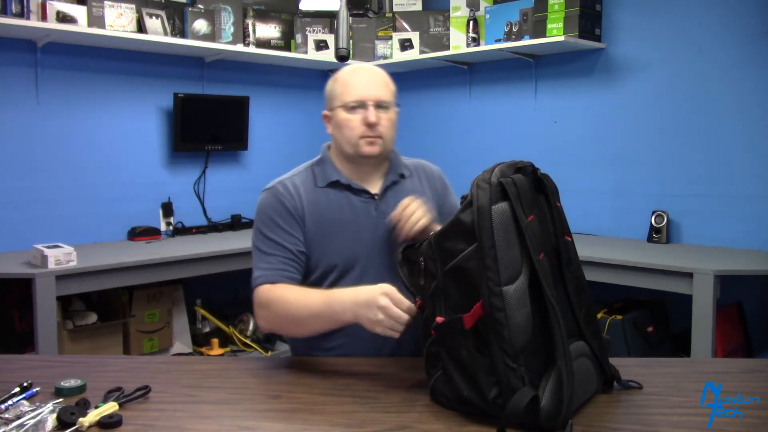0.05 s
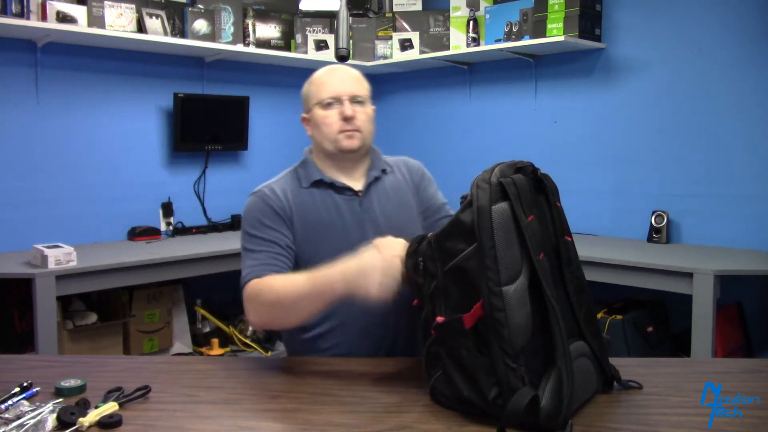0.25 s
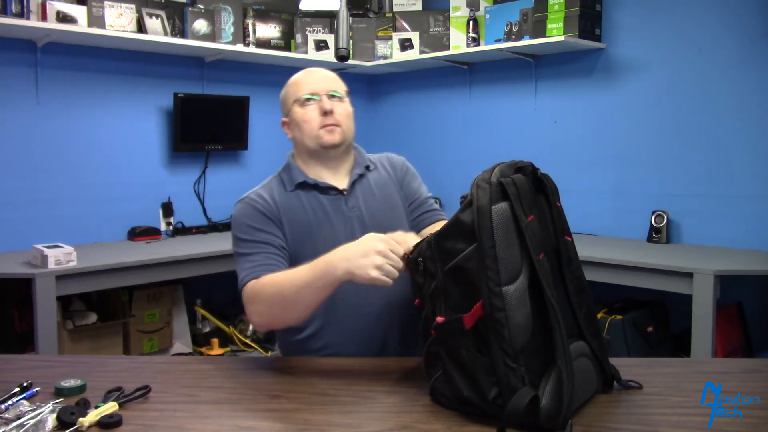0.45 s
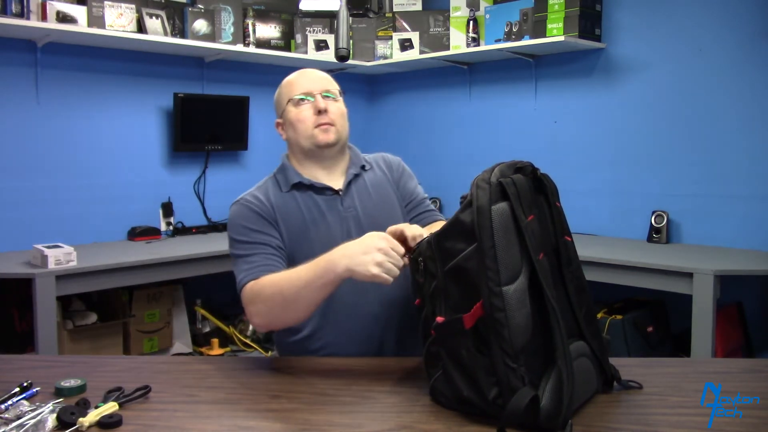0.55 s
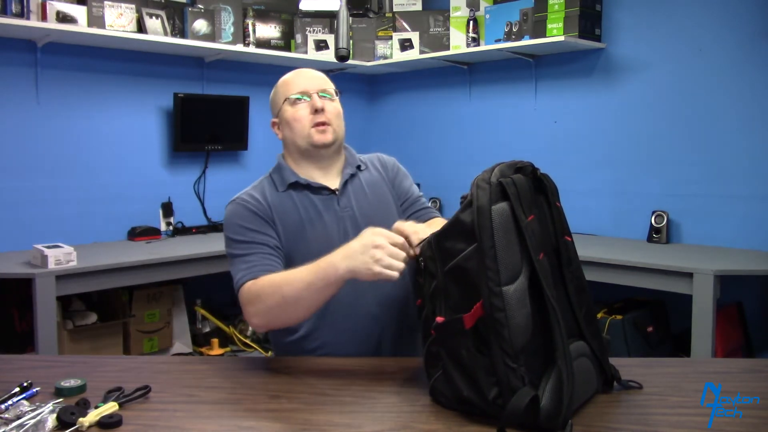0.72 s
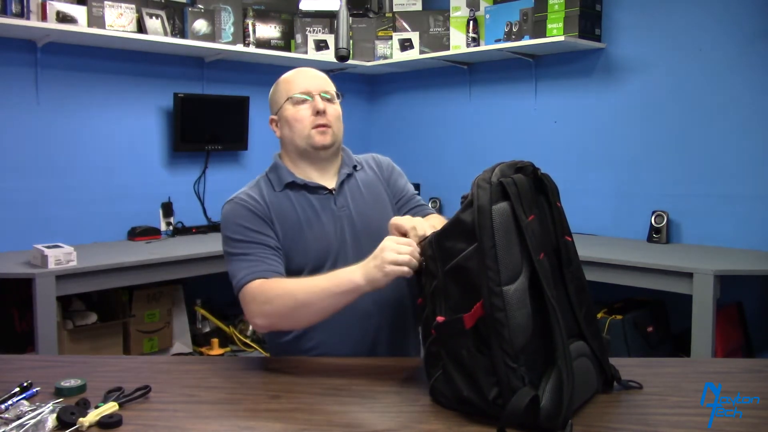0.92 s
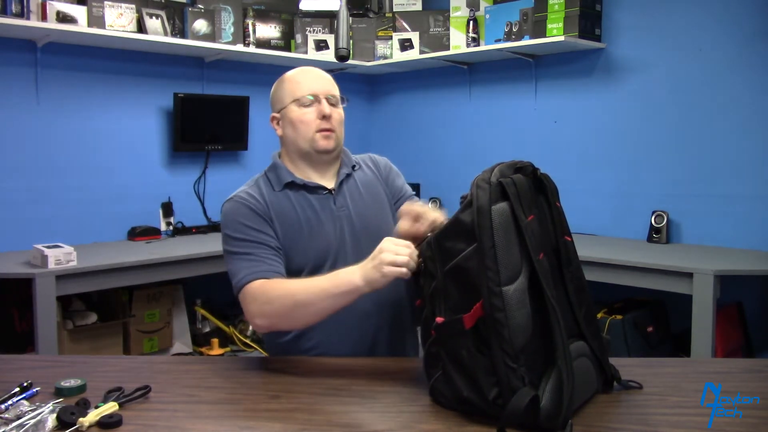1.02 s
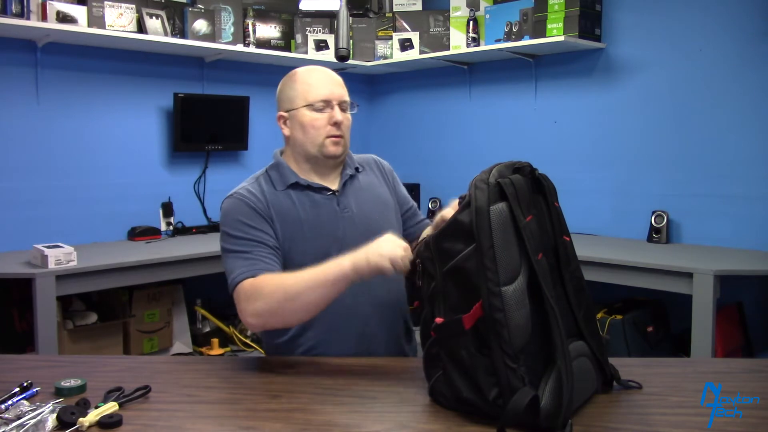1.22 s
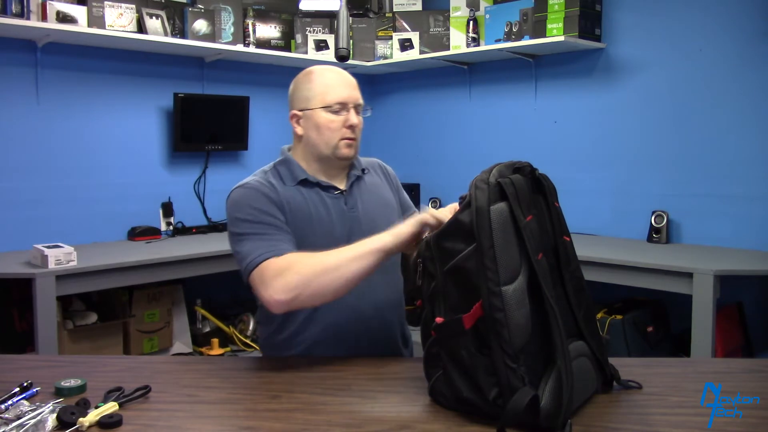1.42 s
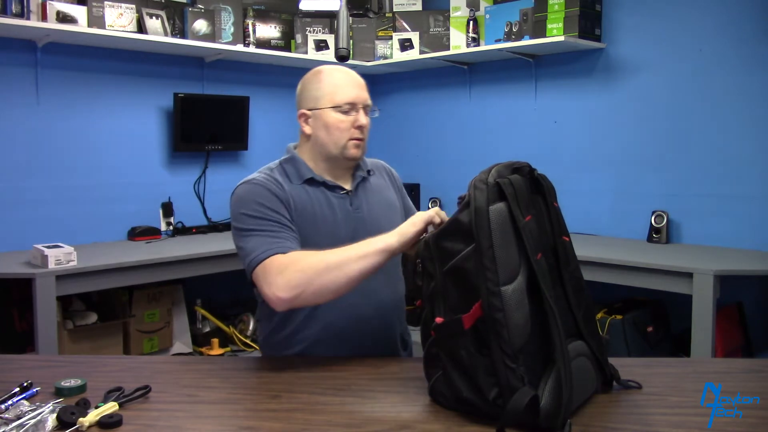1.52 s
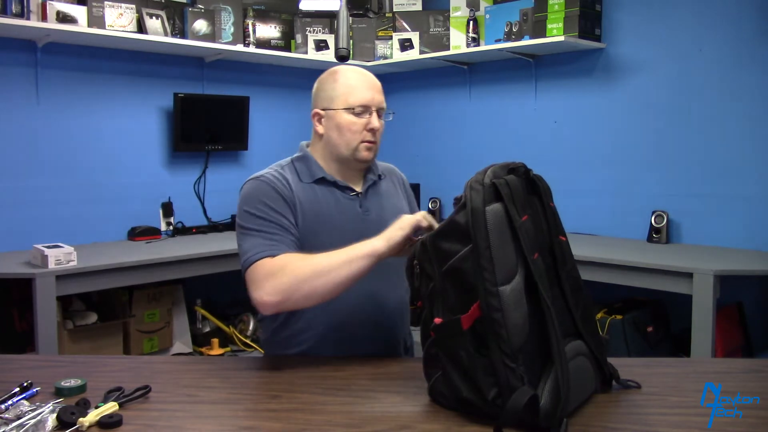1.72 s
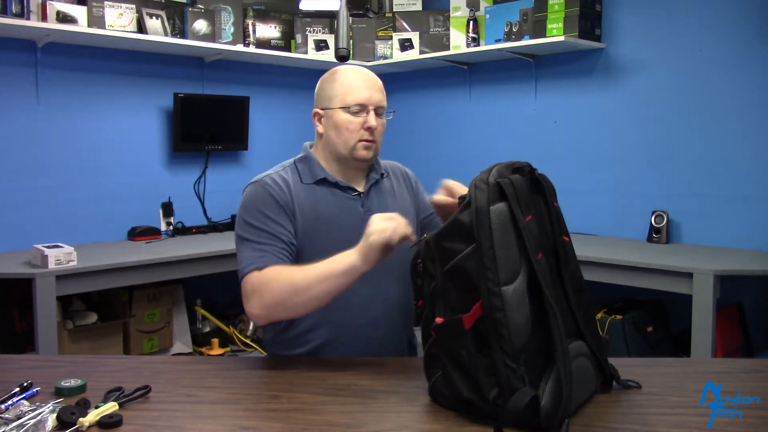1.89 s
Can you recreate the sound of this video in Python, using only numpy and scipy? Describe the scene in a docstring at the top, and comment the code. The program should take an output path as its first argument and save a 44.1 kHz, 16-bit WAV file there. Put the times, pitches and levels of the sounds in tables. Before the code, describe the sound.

A backpack zipper is pulled in three short buzzing strokes, with nylon rustle and small metallic ticks.

```python
"""A small workshop room: a coil zipper on a nylon backpack is pulled in three short strokes and one faint nudge.
The slider buzzes over the teeth as a stack of overtones whose pitch follows the hand; the cloth rustles as
crackling coloured noise and thumps as ringing clusters that knock the bag. The metal pull tab ticks as short
noise bursts, feedback delays give the room, and room tone and a low rumble lie under everything."""
import sys
import numpy as np
from scipy import signal
from scipy.io import wavfile

SR = 44100
rng = np.random.default_rng(int(sys.argv[2]) if len(sys.argv) > 2 else 0)


def convert_level_to_amplitude(level_db):
    """Map a level in decibels to its linear amplitude factor."""
    exponent = np.asarray(level_db, float) / 20
    return 10 ** exponent


def unload_wav(signal):
    """Save mono or channel-first audio to the path in sys.argv[1] as 16-bit WAV at rate SR, clipped to [-1, 1]."""
    wavfile.write(
        sys.argv[1],
        SR,
        np.round(np.clip(np.atleast_2d(signal).T, -1, 1) * 32767).astype(np.int16),
    )


N = 85995  # length in samples


def rms_one(x):
    """Scale to rms 1."""
    return x / np.sqrt(np.mean(x ** 2) + 1e-20)


def in_time(rows):
    """Glide through the columns of a timed table: one value per sample for each column."""
    s, *columns = np.transpose(rows)
    return [np.interp(np.arange(N) / SR, s, column) for column in columns]


def drift(rate_hz):
    """Slow random wander of rms 1: noise through two equal one-pole low-passes."""
    pole = np.exp(-2 * np.pi * rate_hz / SR)
    noise = rng.standard_normal(N + SR)
    settled = signal.lfilter([1], [1, -2 * pole, pole * pole], noise)[SR:]
    return rms_one(settled)


def band_pass(x, low_hz, high_hz, order=2):
    """Butterworth band-pass."""
    return signal.sosfilt(signal.butter(order, [low_hz, high_hz], "band", fs=SR, output="sos"), x)


def coloured(noises, spectrum, patchy_db):
    """Third-octave bands of two noises in turn, each with its level and a flicker; rms 1 in sum."""
    hz, db = np.transpose(spectrum)
    out, edges = 0, 16 * 2 ** (np.arange(31) / 3)
    flicker = [drift(9.5) for _ in range(6)]
    for k, (low, high) in enumerate(zip(edges, edges[1:])):
        level = np.interp(np.log(low * high) / 2, np.log(hz), db)
        if level > -70:  # skip inaudible bands
            band = band_pass(noises[k % 2], low, high)
            out = out + convert_level_to_amplitude(level + patchy_db * flicker[k % 6]) * band
    return rms_one(out)


def ring(clicks, hz, t60_s):
    """Resonator: a unit click sets a decaying sine of height 1 ringing."""
    r, w = convert_level_to_amplitude(-60 / (t60_s * SR)), 2 * np.pi * hz / SR
    return signal.lfilter([0, np.sin(w)], [1, -2 * r * np.cos(w), r * r], clicks + 1e-18)


# colour of the room tone: f/Hz, relative level/dB per Hz
AIR_SPECTRUM = [(53, -20), (90, 13), (786, -7), (977, -22.5), (2710, -12), (6030, -43), (12600, -32),
                (16000, -33)]
# swell of the deep rumble: t/s, level/dB
RUMBLE_LEVEL = [(0.0, -34), (0.054, -48), (0.254, -36.5), (0.396, -48), (1.574, -40.5), (1.95, -48.5)]
AIR_DB, RUMBLE_TOP_HZ = -48.5, 100
FADING_HZ, FADING_WIDTH_HZ, FADING_DB, FADING_END_S = 582, 39, -39, 0.069


def background():
    """Room tone, a wavering deep rumble, and a faint narrow-band noise tone that ends early."""
    air = convert_level_to_amplitude(AIR_DB) * coloured(rng.standard_normal((2, N)), AIR_SPECTRUM, patchy_db=1.5)
    rumble = rms_one(band_pass(drift(44), 18, RUMBLE_TOP_HZ))
    rumble_db, = in_time(RUMBLE_LEVEL)
    tone = rms_one(ring(rng.standard_normal(N), FADING_HZ, 2.2 / FADING_WIDTH_HZ))
    fade_out = np.clip((FADING_END_S - np.arange(N) / SR) / 0.011, 0, 1)
    return air + convert_level_to_amplitude(rumble_db) * rumble + convert_level_to_amplitude(FADING_DB) * tone * fade_out


# cloth rustle: t/s, hiss level/dB, top octave relative to the hiss level/dB, body of the bag level/dB
RUSTLE_MOVES = [(0, -44.5, -7, -49), (.178, -55.5, 0.5, -62), (.194, -36, -11.5, -32.5),
                (.24, -33.5, -13, -32), (.345, -42.5, -11, -37), (.532, -40.5, -10, -77),
                (.574, -49.5, -11, -56), (.646, -46, -8, -48.5), (.672, -53, -9, -54), (.86, -52, -8, -63),
                (.9, -44, -7.5, -49.5), (.93, -50.5, -10, -55.5), (.976, -42.5, -8, -36),
                (1.02, -34.5, -8.5, -34.5), (1.14, -32, -12.5, -35.5), (1.259, -38, -2, -39),
                (1.268, -44, -10, -37.5), (1.428, -58.5, -4.5, -60), (1.447, -41.5, -10, -41),
                (1.514, -37, 0, -36), (1.602, -31, -4, -29.5), (1.645, -46, -12, -31),
                (1.705, -44, -0.5, -36.5), (1.74, -49, -5, -41.5), (1.8, -51, -0.5, -39),
                (1.86, -55.5, -4, -41), (1.95, -62, 1, -48.5)]
# colour of the cloth hiss: f/Hz, relative level/dB per Hz
HISS_SPECTRUM = [(1290, -4), (3740, -6.5), (6700, -6), (7800, -17.5), (11000, -26), (18700, -120)]
# colour of the top octave of the cloth: f/Hz, relative level/dB per Hz
TOP_SPECTRUM = [(6500, -18.5), (11000, -5.5), (12600, -5.5), (14300, -7), (16000, -32)]
# colour of the body of the bag: f/Hz, relative level/dB per Hz
BODY_SPECTRUM = [(65, -52), (110, 1.5), (412, 1.5), (695, -2), (1110, -0.5), (1230, -7.5), (2500, -31.5),
                 (3250, -75)]
GRAINS_PER_S, GRAIN_SPREAD_DB = 3000, 3.3  # typical crackle rate, which wanders; spread of crackle sizes
GRAIN_SHARE, BODY_GRAIN_SHARE = 0.35, 0.34  # power share of crackles in the hiss and in the body
TOOTH_GATE = 0.5  # depth to which the teeth pulse the hiss


def rustle(beat):
    """Nylon rubbing: noise mixed with dense crackles, pulsed by the teeth; the bag sounds below."""
    hiss_db, top_db, body_db = in_time(RUSTLE_MOVES)
    sizes = convert_level_to_amplitude(GRAIN_SPREAD_DB * np.minimum(rng.exponential(1, (2, N)), 5))
    sizes = sizes * rng.choice([-1, 1], (2, N))
    chance = GRAINS_PER_S * convert_level_to_amplitude(4.0 * drift(25)) / SR
    grains = rms_one(sizes * (rng.random((2, N)) < chance))
    white = rng.standard_normal((2, N))
    rub = np.sqrt(GRAIN_SHARE) * grains + np.sqrt(1 - GRAIN_SHARE) * white
    dull = np.sqrt(BODY_GRAIN_SHARE) * grains + np.sqrt(1 - BODY_GRAIN_SHARE) * white
    rub = rub * (1 + TOOTH_GATE * beat)
    hiss = coloured(rub, HISS_SPECTRUM, patchy_db=2.5)
    hiss = hiss + convert_level_to_amplitude(top_db) * coloured(rub, TOP_SPECTRUM, patchy_db=3.0)
    body_gain = convert_level_to_amplitude(body_db + 1.5 * drift(45))
    return convert_level_to_amplitude(hiss_db) * hiss + body_gain * coloured(dull, BODY_SPECTRUM, patchy_db=2.0)


# cloth thumps: first touch t/s, peak level ahead of the band-pass/dB, pitch f/Hz, level of the bag's answer/dB
THUMP_HITS = [(0.129, -27.5, 1410, -68), (0.64, -21.5, 980, -49), (.782, -33, 1120, -39.5),
              (.838, -19, 826, -39), (.841, -22, 1210, -37.5), (.895, -32, 1050, -50),
              (1.239, -30, 1007, -34), (1.251, -22.5, 1310, -37), (1.272, -22, 870, -28),
              (1.356, -31.5, 1100, -49), (1.4345, -20.5, 1337, -33), (1.443, -22, 1250, -30),
              (1.4652, -20.5, 1450, -27.5), (1.477, -28, 1630, -29), (1.491, -17.5, 1380, -21),
              (1.6187, -9.5, 1040, -26.5), (1.643, -18, 1100, -41), (1.782, -21, 1320, -43),
              (1.806, -25, 1860, -51), (1.819, -27, 2350, -40), (1.837, -23.5, 1120, -34.5),
              (1.848, -36, 900, -31.5)]
# modes of the bag: f/Hz, relative level/dB, t60/s
BAG_MODES = [(276, 16.5, 0.017), (476, 3.5, 0.019), (583, 4, 0.031)]
THUMP_CYCLES, CONTACT_S = 7.0, 0.001  # cycles to ring down by 60 dB; time from first touch to the blow
CRUMPLE_T60_S = 0.027  # decay of the cluster in each blow
BAG_CREST_DB = 10.5  # peak of the bag's answer over its level


def thumps():
    """Each thump is a short cluster that rings a few cycles at its pitch and knocks the bag."""
    length = 3000
    out = np.zeros(N)
    mode_spread_db = rng.normal(0, 1.5, (len(THUMP_HITS), len(BAG_MODES)))
    decay = convert_level_to_amplitude(-60 * np.arange(length) / SR / CRUMPLE_T60_S)
    clusters = rng.standard_normal((len(THUMP_HITS), length)) * decay * 0.065
    clusters[:, 0] = -1  # the first click leads the cluster
    for (s, db, hz, bag_db), spread, blow in zip(THUMP_HITS, mode_spread_db, clusters):
        i = int((s + CONTACT_S) * SR)
        knock = ring(blow, hz, THUMP_CYCLES / hz)
        bag = sum(convert_level_to_amplitude(d + c) * ring(blow, f, t60) for (f, d, t60), c in zip(BAG_MODES, spread))
        out[i:i + length] += convert_level_to_amplitude(db) * knock / np.abs(knock).max()
        out[i:i + length] += convert_level_to_amplitude(bag_db + BAG_CREST_DB) * bag / np.abs(bag).max()
    return band_pass(out, 150, 2500)


# ticks of the metal pull tab: t/s, peak level/dB, pitch f/Hz
TAB_TICKS = [(0.1305, -30, 5230), (0.19, -18.5, 5950), (0.5259, -25, 5450), (0.6564, -18, 5540),
             (0.6693, -28.5, 6600), (1.027, -18, 3800), (1.0765, -25, 4200), (1.256, -22.5, 6500),
             (1.275, -21, 6360), (1.4694, -20.5, 6100), (1.481, -22, 6100), (1.806, -27, 13400),
             (1.8177, -9.5, 11100), (1.8219, -24.5, 10330), (1.833, -27, 6800)]
TICK_T60_S, TICK_WIDTH, TICK_CRACK_DB = 0.008, 0.12, -11  # width: part of the pitch to either side


def ticks():
    """Each tick is a short dying noise burst around its pitch on a broad crack."""
    length = 1500
    out = np.zeros(N)
    decay = convert_level_to_amplitude(-60 * np.arange(length) / SR / TICK_T60_S)
    for (s, db, hz), white in zip(TAB_TICKS, rng.standard_normal((len(TAB_TICKS), length))):
        low_hz, high_hz = hz * (1 - TICK_WIDTH), min(hz * (1 + TICK_WIDTH), 0.45 * SR)
        pitched = rms_one(band_pass(white, low_hz, high_hz, order=1))
        burst = (pitched + convert_level_to_amplitude(TICK_CRACK_DB) * white) * decay
        i = int(s * SR)
        out[i:i + length] += convert_level_to_amplitude(db) * burst / np.abs(burst).max()
    return out


# slider strokes, one table each: t/s, tooth rate f/Hz, level of overtones 1, 2 and 3/dB (1 is the tooth rate)
SLIDER_STROKES = [
    [(0.19, 263.9, -40, -53, -50), (0.206, 321.7, -30, -37, -29), (0.214, 384.5, -27, -29.5, -21),
     (0.226, 490, -31, -11.5, -21.5), (0.238, 547.7, -25, -13.5, -32), (0.25, 574.2, -23.5, -18.5, -27.5),
     (0.26, 502, -38, -17.5, -23), (0.274, 376.8, -26, -34, -24), (0.3, 260, -23, -41, -42),
     (0.32, 201, -32.5, -44, -52), (0.338, 157, -20, -36, -57)],
    [(0.898, 80, -44, -70, -70), (0.94, 431, -46, -65, -70)],
    [(0.97, 229.8, -33.5, -41, -33), (0.996, 320.2, -24, -19.5, -32), (1.02, 421.9, -18.5, -21.5, -31.5),
     (1.064, 378.1, -22.5, -26.5, -24.5), (1.09, 404.1, -30, -39, -22.5), (1.114, 440.6, -35, -39, -38),
     (1.144, 589.3, -19, -22.5, -33), (1.156, 644.4, -22.5, -17.5, -39), (1.182, 503, -17.5, -32, -35),
     (1.2, 437, -31, -22.5, -41), (1.245, 214, -29, -62, -57)],
    [(1.485, 137, -40, -44, -51), (1.493, 192, -47, -15.5, -29), (1.503, 259.1, -33, -24, -51),
     (1.525, 419.6, -38, -25, -50), (1.535, 489.6, -21.5, -25, -42), (1.551, 578.2, -25.5, -36, -37),
     (1.567, 547.2, -16, -30.5, -29.5), (1.591, 579, -20.5, -37, -33.5), (1.607, 497, -22, -26.5, -30),
     (1.621, 294.3, -19.5, -25, -31.5), (1.64, 200, -21, -25, -40)],
]
# overtone 4 relative to overtone 3, one for each stroke: level/dB
UPPER_LEVEL = [-15, -20, -10, -3]
# noisy power share of overtones 1, 2, 3 and the upper ones, squared in use [0 to 1]
ROUGHNESS = [.2, .15, .4, .5]
UPPER_FALL_DB = 5.5  # loss for each overtone above the fourth
SLOW_ROUGH_HZ = 340  # below this rate the teeth catch unevenly
TOOTH_JITTER, TOOTH_FLUTTER_DB = 0.014, 1.2  # rms wander of the rate (share of it) and of each level
FADE_S = 0.015  # at both ends of a stroke


def zipper():
    """Overtones of the uneven tooth rate, each partly smeared into noise; also the beat of the teeth."""
    t, out, beat = np.arange(N) / SR, 0, 0
    wobble = drift(70)
    smear = [drift(120) + 1j * drift(120) for _ in range(8)]
    flutter = [drift(50) for _ in range(8)]
    for rows, upper_db in zip(SLIDER_STROKES, UPPER_LEVEL):
        hz, *levels = in_time(rows)
        on = np.clip(np.minimum(t - rows[0][0], rows[-1][0] - t) / FADE_S, 0, 1)
        levels += [levels[2] + upper_db - UPPER_FALL_DB * k for k in range(5)]
        phase = 2 * np.pi * np.cumsum(hz * (1 + TOOTH_JITTER * wobble)) / SR
        slow = np.maximum(SLOW_ROUGH_HZ / hz, 1) ** 6
        for k, db in enumerate(levels):
            rough = np.clip(ROUGHNESS[min(k, 3)] ** 2 * slow, 0, 0.55)
            steady_and_smeared = np.sqrt(2 - 2 * rough) + np.sqrt(rough) * smear[k]
            # the phase offset grows with the square of the order, which spreads the pulse
            line = steady_and_smeared * np.exp(1j * ((k + 1) * phase + 0.44 * k * k))
            out = out - on * convert_level_to_amplitude(db + TOOTH_FLUTTER_DB * flutter[k]) * line.real
        beat = beat + on * np.cos(phase)
    return out, beat


# resonances of the hollow of the bag: f/Hz
POCKET_MODES = [1090, 1140, 930]
POCKET_T60_S, POCKET_DB = 0.35, -61  # decay; gain on the resonators


def pocket(teeth):
    """The hollow of the bag rings on after the teeth: long resonators driven by the buzz."""
    return convert_level_to_amplitude(POCKET_DB) * sum(ring(teeth, hz, POCKET_T60_S) for hz in POCKET_MODES)


ROOM_T60_S, ROOM_DB, WALL_CUT_HZ = 0.29, -18.5, 4000  # decay of the lows, gain, low-pass on every round


def room(x):
    """Ten feedback delays of alternating sign, duller on every round."""
    out, dull = np.zeros(N), np.exp(-2 * np.pi * WALL_CUT_HZ / SR)
    for k, lag in enumerate((rng.uniform(0.015, 0.045, 10) * SR).astype(int)):
        loop, gain, state = x.copy(), convert_level_to_amplitude(-60 * lag / SR / ROOM_T60_S), [0.]
        for i in range(lag, N, lag):
            back, state = signal.lfilter([gain * (1 - dull)], [1, -dull], loop[i - lag:i], zi=state)
            loop[i:i + lag] += back[:N - i]
        out += (loop - x) * (-1) ** k  # echoes only
    return out


def scene():
    """Zipper, pocket, thumps and ticks with their room, then rustle and background."""
    teeth, beat = zipper()
    near = teeth + pocket(teeth) + thumps() + ticks()
    mix = near + convert_level_to_amplitude(ROOM_DB) * room(near) + rustle(beat) + background()
    return mix[None]  # one channel


def top_cut(x):
    """Nothing passes above about 17 kHz."""
    return signal.sosfilt(signal.butter(12, 16990, fs=SR, output="sos"), x)


def record(dry):
    """A steep low-pass cuts the top: 50 dB down from 16.3 kHz."""
    low_pass = signal.cheby2(10, 50, 16300, fs=SR, output="sos")
    mix = signal.sosfilt(low_pass, dry)
    return top_cut(mix)


dry = scene()
out = record(dry)
unload_wav(out)
```